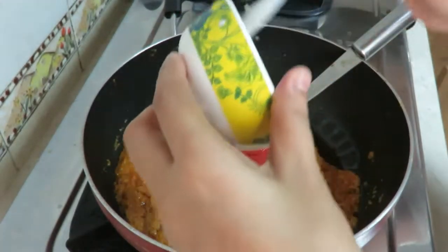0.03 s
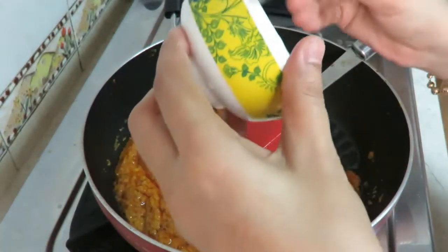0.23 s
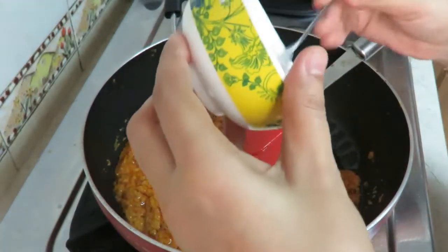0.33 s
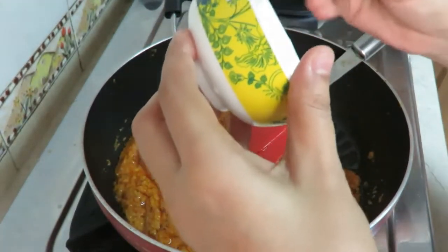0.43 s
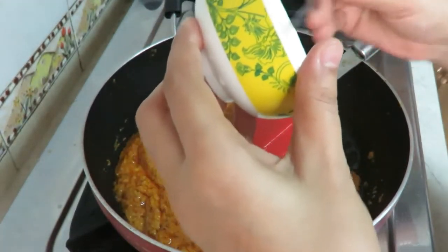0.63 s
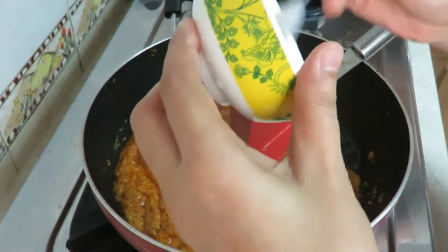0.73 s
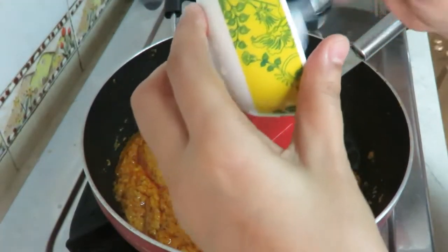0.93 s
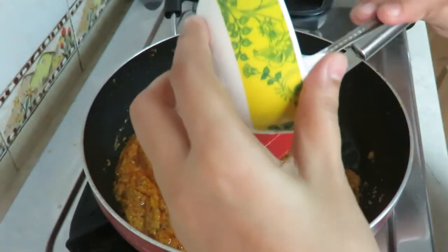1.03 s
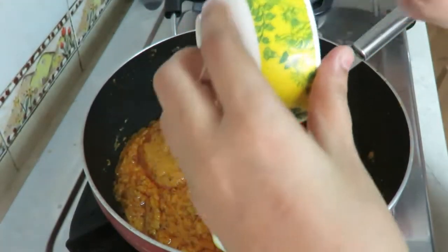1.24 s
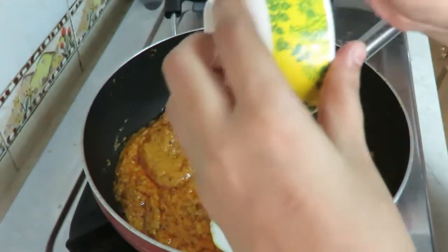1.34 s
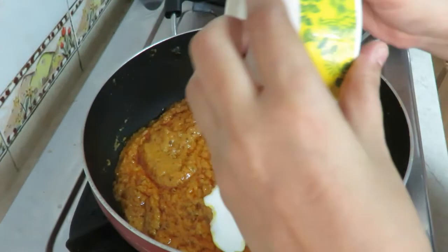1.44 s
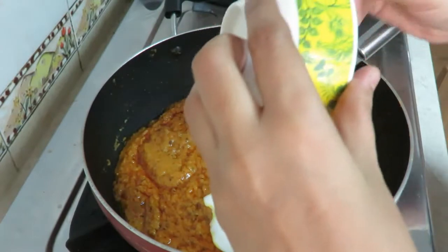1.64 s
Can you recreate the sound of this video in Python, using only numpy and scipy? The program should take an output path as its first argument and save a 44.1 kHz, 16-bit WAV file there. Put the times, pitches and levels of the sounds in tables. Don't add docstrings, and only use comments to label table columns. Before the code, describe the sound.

Close up, gritty spoon scrapes and short dull clinks on a held ceramic bowl come in clusters, pause, resume, peak with a sharp knock and fade to light ticks, over faint simmer and burner hum.

```python
import sys
import numpy as np
from scipy import signal
from scipy.fft import rfft, irfft, next_fast_len
from scipy.io import wavfile
from scipy.ndimage import map_coordinates

SR = 44100
rng = np.random.default_rng(int(sys.argv[2]) if len(sys.argv) > 2 else 0)


def inscribe(sig):
    pcm = np.round(np.clip(np.atleast_2d(sig).T, -1, 1) * 32767)
    wavfile.write(sys.argv[1], SR, pcm.astype(np.int16))


def voltage_ratio(level):
    return 10 ** (np.asarray(level, float) / 20)


N = 74970


def unit(x):
    return x / np.sqrt(np.mean(x ** 2) + 1e-20)


def along(points, hz):
    f, v = np.transpose(points)
    return np.interp(np.log(hz + 1), np.log(f + 1), v)


def wobble(knots_per_s):
    knots = rng.standard_normal(int(N * knots_per_s / SR) + 4)
    return map_coordinates(knots, [np.arange(N) * knots_per_s / SR])


def filtered(x, response):
    n = x.shape[-1]
    m = next_fast_len(n + 8192)
    return irfft(rfft(x, m) * response(np.fft.rfftfreq(m, 1 / SR)), m)[..., :n]


def resonances(modes, order):
    def response(f):
        total = 0
        for k, (hz, width_hz, db) in enumerate(modes):
            peak = 1j * f * width_hz / (hz * hz - f * f + 1j * f * width_hz)
            total = total + (-1) ** k * voltage_ratio(db) * peak ** order
        return total
    return response


def widths(modes, rule):
    return [(hz, rule[0] + rule[1] * hz, db) for hz, db in modes]


def spread(pair, alike, spectrum):
    def mix(hz):
        turn = np.arccos(np.clip(along(alike, hz), -1, 1)) / 2
        return voltage_ratio(along(spectrum, hz)) * [np.cos(turn), np.sin(turn)]
    mid, side = filtered(pair, mix)
    return np.array([mid + side, mid - side])


# (frequency [Hz], t60 [s])
KITCHEN_T60 = [(500, 0.46), (1100, 0.49), (1700, 0.3), (2800, 0.47), (5000, 0.41), (14000, 0.3)]
# (frequency [Hz], left-right likeness [-])
ROOM_ALIKE = [(500, 0.67), (2000, 0.96), (6000, 0.88), (12000, 0.035)]


def kitchen(x):
    WET_DB, WALL_S = -5.5, 0.0017
    hz, t, z = signal.stft(rng.standard_normal((2, SR // 2)), SR, nperseg=256)
    decay = voltage_ratio(-60 * t / along(KITCHEN_T60, hz)[:, None])
    tail = signal.istft(z * decay, SR, nperseg=256)[1]
    tail = spread(tail, ROOM_ALIKE, [(100, 0)])
    tail *= 1 - np.exp(-(np.arange(tail.shape[1]) / SR / WALL_S) ** 2)
    return voltage_ratio(WET_DB) * signal.fftconvolve(x[None], tail / np.linalg.norm(tail[0]), axes=1)[:, :N]


# (frequency [Hz], level [dB])
SIDEWAYS = [(600, -10.5), (2400, -16), (4400, -10.5), (8000, -3), (14000, -0.5)]


def placed(out, dry, start_s):
    turns = rng.standard_normal(64)
    turn_hz = np.linspace(0, SR / 2, len(turns))
    side = filtered(dry, lambda f: 1j * np.interp(f, turn_hz, turns) * voltage_ratio(along(SIDEWAYS, f)))
    wet = kitchen(dry)
    near = np.pad([dry + side, dry - side], ((0, 0), (0, wet.shape[1] - len(dry))))
    return out + np.pad(near + wet, ((0, 0), (round(start_s * SR), N)))[:, :N]


# (frequency [Hz], density [dB/Hz])
RUMBLE = [(25, -46), (50, -2.5), (100, -4.5), (160, -2), (200, -5.5), (260, -14), (350, -21), (480, -15)]
# (frequency [Hz], left-right likeness [-])
RUMBLE_ALIKE = [(60, 1), (130, 0.7), (300, 0.31)]
# (time [s], hum level [dB], roar level [dB])
STOVE_LEVELS = [(0, -62, -63.5), (.03, -51.5, -66), (0.121, -57, -66.5), (0.164, -48, -69), (.2, -56.5, -60.5),
                (.38, -70, -59.5), (.44, -55, -63), (0.536, -49, -54), (.6, -50, -61.5), (0.66, -57, -59),
                (.78, -90, -60), (.85, -56, -60.5), (0.962, -61, -58), (1.06, -100, -60.5), (1.26, -46.5, -59.5),
                (1.309, -83, -60.5), (1.36, -55, -74), (1.41, -76, -66), (1.54, -78, -70.5), (1.62, -49.5, -64.5)]
# (time [s], level [dB])
OCTAVE = [(0, -72), (.11, -64), (.19, -70), (.25, -63), (.38, -70), (.45, -65), (.65, -57.5), (.8, -66),
          (.85, -55.5), (.95, -73), (1.05, -53.5), (1.2, -74), (1.264, -57), (1.32, -98), (1.56, -75.5),
          (1.65, -63.5)]
# (frequency [Hz], density [dB/Hz])
FAINT = [(600, -28), (1100, -30), (1300, -5), (1600, -43), (6000, -36.5), (9000, -40)]
# (time [s], level [dB], frequency [Hz], width [Hz])
SPIT = [
    (0.052, -61, 6350, 550),
]


def stove():
    HUM_HZ, FLICKER_DB = 99, 1.5
    FAINT_DB, SPIT_T60_S, SPIT_ATTACK_S = -79, 0.13, 0.0035
    t = np.arange(N) / SR

    def noise(spectrum, alike):
        ends = [(11, -120)], [(5.4 * spectrum[-1][0], -120)]
        return unit(spread(rng.standard_normal((2, N)), alike, ends[0] + list(spectrum) + ends[1]))

    when, hum_db, roar_db = np.transpose(STOVE_LEVELS)
    roar = voltage_ratio(np.interp(t, when, roar_db) + 0.32 * wobble(10.5)) * noise(RUMBLE, RUMBLE_ALIKE)
    hum = np.sin(2 * np.pi * HUM_HZ * t + 1.2 * wobble(14))
    hum = hum * voltage_ratio(np.interp(t, when, hum_db) + FLICKER_DB * wobble(18))
    octave = np.sin(2 * np.pi * 2 * HUM_HZ * t + 0.71 * wobble(9.35))
    octave = octave * voltage_ratio(np.interp(t, *np.transpose(OCTAVE)))
    air = voltage_ratio(FAINT_DB + 10.1 * wobble(24)) * noise(FAINT, ROOM_ALIKE)
    for s, db, hz, width_hz in SPIT:
        fizz = rng.standard_normal((2, N))
        fizz = unit(filtered(fizz, lambda f: np.exp(-((f - hz) / width_hz) ** 2)))
        fade = voltage_ratio(db - 60 * np.abs(t - s) / SPIT_T60_S)
        air = air + fade * np.clip((t - s) / SPIT_ATTACK_S, 0, 1) * fizz
    return roar + hum + octave + air


# (start [s], length [s], first level [dB], last level [dB], hiss level [dB])
STROKES = [(0.151, 0.039, -63.5, -39, 2), (0.193, 0.1, -36, -60, -6), (.274, 0.028, -36.5, -29.5, -26),
           (0.305, 0.056, -33, -33, -13), (0.497, 0.021, -67, -38, 2), (0.528, 0.05, -36, -66, 9.5),
           (0.597, 0.061, -43.5, -32.5, -8.5), (0.665, 0.031, -27, -31, -14),
           (0.708, 0.0068, -43, -46, -3.5), (0.905, 0.041, -30, -38.5, -9), (0.944, 0.042, -52, -30.5, -18),
           (0.999, 0.039, -28.5, -27, -20), (1.043, 0.078, -36, -48.5, -9), (1.104, 0.19, -62, -72.5, -4),
           (1.255, 0.0061, -75, -49, 22), (1.265, 0.1, -24.5, -46, -11.5), (1.397, 0.039, -55, -36, 0.5),
           (1.439, 0.14, -38.5, -63, -6), (1.549, 0.064, -60.5, -56.5, -0.5),
           (1.619, 0.056, -54.5, -56.5, -3)]
STROKE_PATH = [0, 0, 0, 7, 1, 1, 1, 2, 2, 8, 8, 3, 9, 5, 4, 4, 5, 5, 10, 6]
# (frequency [Hz], level [dB])
PATHS = [
    [(1660, 5), (1790, -1), (3000, -12.5), (5650, -5.5), (6050, -31), (7650, -38), (9900, -18)],
    [(1400, 2.5), (1660, 0.5), (1950, -4.5), (3050, -11), (3900, -7), (5500, -4), (7300, -8), (10000, -15)],
    [(1680, 0.5), (1830, 2.5), (1950, -3), (3000, -23), (5600, -7.5), (7600, -11.5)],
    [(1670, 4.5), (1840, -0.5), (2350, -6.5), (2850, -8.5), (3550, -11.5), (5500, -15), (5950, -21),
     (7450, -33), (10100, -16.5)],
    [(1250, 7), (1640, 14), (1780, 6), (3100, -6), (5400, 2), (7300, -12)],
    [(1100, -18), (1650, 3.5), (1950, 2), (3340, 6.5), (5780, 4.5), (7600, -19), (10100, -17)],
    [(1200, 0), (2450, 10), (3650, 3), (5400, -3.5), (7250, -6)],
    [(1640, 3.5), (1820, -12), (3020, -35), (3730, -17), (5540, -7), (6040, -1.5), (7500, -15),
     (9900, -13.5), (10800, -16), (13700, -20)],
    [(1700, 7), (1840, 2.5), (2750, -11), (3060, -4.5), (3890, -6.5), (5500, -12), (7460, -19)],
    [(1680, -8), (1900, 4), (2360, -1), (2900, 4), (3600, -3), (5550, 0.5), (5900, -11), (7500, -20)],
    [(1240, 4), (1900, -0.5), (3300, -2), (5700, -8)],
]
# (frequency [Hz], level [dB])
UPPER = [(800, -1.5), (1270, 10), (2200, 0), (2850, 7.5), (3350, 4.5), (3900, 4), (4700, 0.5), (5600, 5),
         (7400, 6), (7900, -4), (10100, 5), (11800, -1), (13300, 1)]
# (at rest [Hz], growth [Hz/Hz])
SONG_WIDTH = (60, 0.052)
HISS_WIDTH = (194, 0.17)
# (lower, upper [Hz])
MAIN_HZ = (1600, 1920)


def drag():
    ATTACK_S, RELEASE_T60_S = 0.0011, 0.1
    GRIT_DB, SLIPS_PER_S, SLIP_DB = 2.5, 100, 1.5
    SING_DB, SING_WANDER_RAD = -15, 1.21
    out = np.zeros((2, N))
    t = np.arange(SR // 4) / SR
    n = len(t)
    for (s, length, first_db, last_db, hiss_db), path in zip(STROKES, STROKE_PATH):
        edge = np.clip(t / ATTACK_S, 0, 1) * voltage_ratio(-60 * np.maximum(t - length, 0) / RELEASE_T60_S)
        force_db = np.interp(t, [0, length], [first_db, last_db])
        force = edge * voltage_ratio(force_db + SLIP_DB * wobble(SLIPS_PER_S)[:n])
        lock = 0
        for hz, _ in PATHS[path]:
            if MAIN_HZ[0] < hz < MAIN_HZ[1]:
                lock = lock + np.sin(2 * np.pi * hz * t + SING_WANDER_RAD * wobble(25.2)[:n])
        song = resonances(widths(PATHS[path], SONG_WIDTH), 2)
        hiss = resonances(widths(UPPER, HISS_WIDTH), 2)
        scrape = 0
        for response, db, locked in ((song, 0, lock), (hiss, hiss_db, 0)):
            grit = rng.standard_normal(n) * voltage_ratio(GRIT_DB * rng.standard_normal(n))
            grit = grit + voltage_ratio(SING_DB) * locked
            scrape = scrape + voltage_ratio(db) * filtered(grit * force, response) / np.std(filtered(grit, response))
        out = placed(out, scrape, s)
    return out


# (time [s], peak level [dB], steel rattle level [dB], rattle tilt [dB/octave])
KNOCKS = [(.184, -11.5, -20, 10), (.353, -17, -12, 0.5), (.523, -10.5, -12.5, 20), (.584, -13, -5.5, -5),
          (.661, -11.5, -14, -6), (0.8902, -11.5, -3.5, -1), (1.263, -3, -5, -3.5), (1.43, -14, -4.5, -6),
          (1.606, -40.5, -4, -16), (1.651, -36, -23, -20), (1.666, -41.5, -18, -11), (.962, -35, -20, 17),
          (1.051, -24.5, -17, -3), (1.187, -42.5, -11, -15), (1.197, -43.5, -10, -4)]
# (frequency [Hz], level [dB])
EARLY_SPOTS = [
    [(900, -23.5), (1680, 0), (1830, -5), (3200, -27), (4950, -12.5), (7000, -15), (9800, -15)],
    [(1000, -11), (1700, -0.5), (2950, -7), (5500, -19), (7600, -9)],
    [(800, -15.5), (1250, -1.5), (1450, 0.5), (1950, -3.5), (2700, -7.5), (4150, 3.5), (5450, -5),
     (7100, -6), (7900, -2.5), (10300, -3)],
    [(650, -4.5), (820, -2.5), (1450, -10), (1680, 2.5), (1980, 2.5), (3900, -7), (5500, -10.5),
     (7300, -27)],
    [(1000, -23), (1680, -1), (1870, 1.5), (3000, -17), (3800, -13), (5700, -47)],
]
# (frequency [Hz], level [dB])
LATER_SPOTS = [
    [(800, -21), (1710, 4.5), (1860, -4), (3830, -8.5), (7500, -17), (10700, -12), (15000, -17)],
    [(700, -23.5), (900, -18), (1250, -25.5), (1660, 1.5), (1880, -6), (2800, -19), (3300, -13),
     (4500, -14), (5800, -12.5), (7400, -34), (10200, -44)],
    [(640, 3), (1050, 3), (1600, 2.5), (1900, 10.5), (2240, 6.5), (3350, -17), (5700, -7), (7550, -0.5),
     (9900, -23)],
    [(1240, 0.5), (1900, 1)],
    [(2400, 5), (3650, -2)],
    [(2300, 6), (3750, 5)],
    [(900, -4), (1250, -2)],
    [(2800, 2), (3500, -3), (3950, -7.5)],
    [(1150, -5), (1500, 2)],
    [(950, 2), (1300, 7), (1750, 4)],
]
# (at rest [Hz], growth [Hz/Hz])
KNOCK_WIDTH = (120, .025)


def knocks():
    SPOT_DB, CONTACT_S, RATTLE_S = 9.5, 0.00057, 0.0019
    out = np.zeros((2, N))
    t = np.arange(SR // 8) / SR
    push = (t / CONTACT_S) ** 2 * np.exp(-t / CONTACT_S)
    for (s, db, rattle_db, tilt_db), spot in zip(KNOCKS, EARLY_SPOTS + LATER_SPOTS):
        ring = 0
        for hz, width_hz, level_db in widths(spot, KNOCK_WIDTH):
            drive = push * np.sin(2 * np.pi * (hz * t + rng.random()))
            ring = ring + voltage_ratio(level_db) * filtered(drive, resonances([(hz, width_hz, 0)], 1))
        steel = []
        for hz, width_hz, level_db in widths(UPPER, HISS_WIDTH):
            level_db = level_db + tilt_db * np.log2(hz / 2000) + SPOT_DB * rng.standard_normal()
            steel.append((hz, width_hz, level_db))
        chatter = t * np.exp(-t / RATTLE_S) * rng.standard_normal(len(t))
        rattle = filtered(chatter, resonances(steel, 2))
        knock = ring / np.abs(ring).max() + voltage_ratio(rattle_db) * rattle / np.abs(rattle).max()
        out = placed(out, voltage_ratio(db) * knock, s)
    return out


def small_bowl(f):
    LOW_HZ, LOW_CUT_DB = 609, 19
    highpass = (-f * f / (LOW_HZ ** 2 - f * f + 1.2j * f * LOW_HZ)) ** 2
    return highpass * voltage_ratio(-LOW_CUT_DB * np.clip((LOW_HZ - f) / 60, 0, 1))


def scene():
    return filtered(knocks() + drag(), small_bowl) + stove()


def low_pass(x):
    return signal.sosfilt(signal.butter(12, 16460, fs=SR, output="sos"), x)


# (frequency [Hz], width [Hz], level [dB])
NOTCHES = [(8860, 162, -0.5), (13100, 74, -37)]
# (time [s], frequency [Hz])
EDGE = [(.2, 15200), (.3, 14900), (.31, 14200), (.87, 14200), (.885, 15700), (.905, 14700), (1, 14250),
        (1.25, 14000), (1.26, 14450), (1.7, 14100)]


def record(dry):
    def narrow_dips(f):
        return voltage_ratio(sum(db * np.exp(-((f - hz) / width_hz) ** 2) for hz, width_hz, db in NOTCHES))
    hz, t, z = signal.stft(filtered(dry, narrow_dips), SR, nperseg=512)
    above_hz = hz[:, None] - np.interp(t, *np.transpose(EDGE))
    edge = voltage_ratio(-50 * np.clip(above_hz / 300, 0, 1))
    mix = signal.istft(z * edge, SR, nperseg=512)[1][:, :N]
    return low_pass(mix)


dry = scene()
out = record(dry)
inscribe(out)
```